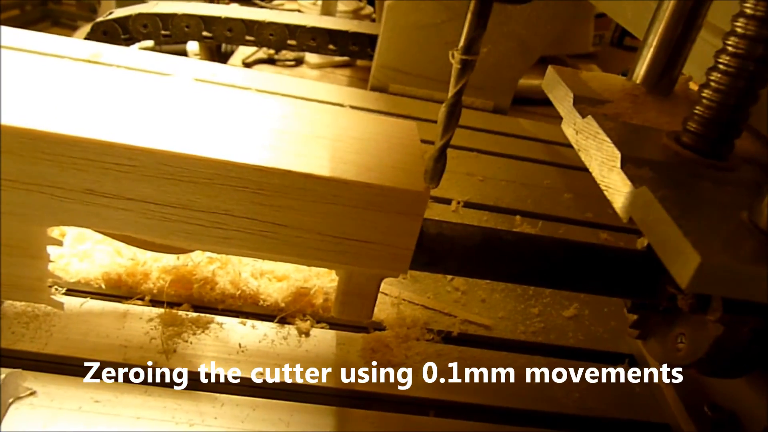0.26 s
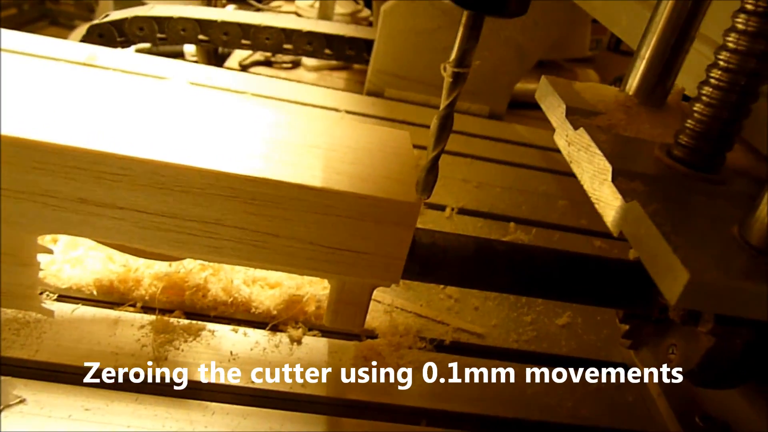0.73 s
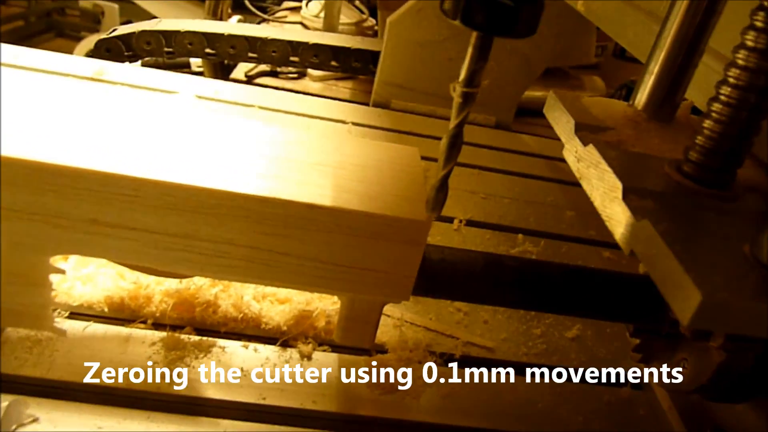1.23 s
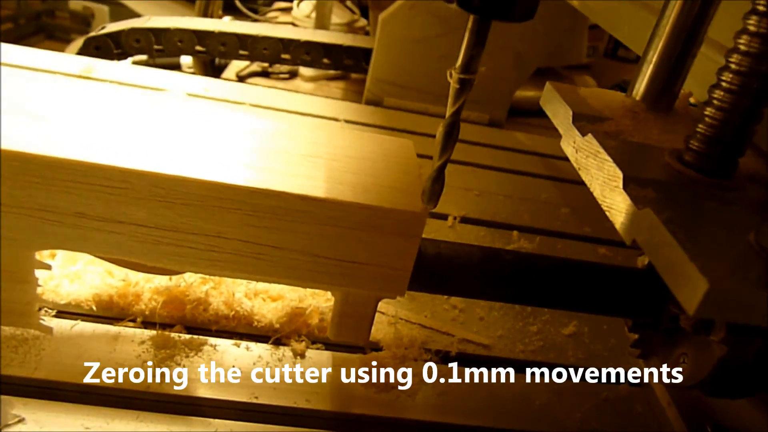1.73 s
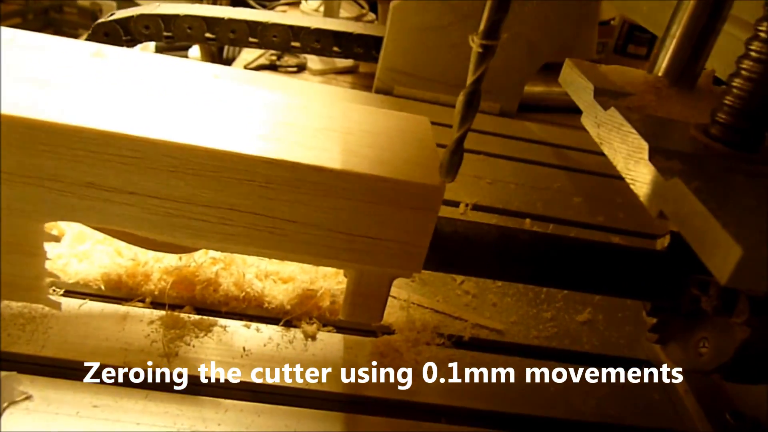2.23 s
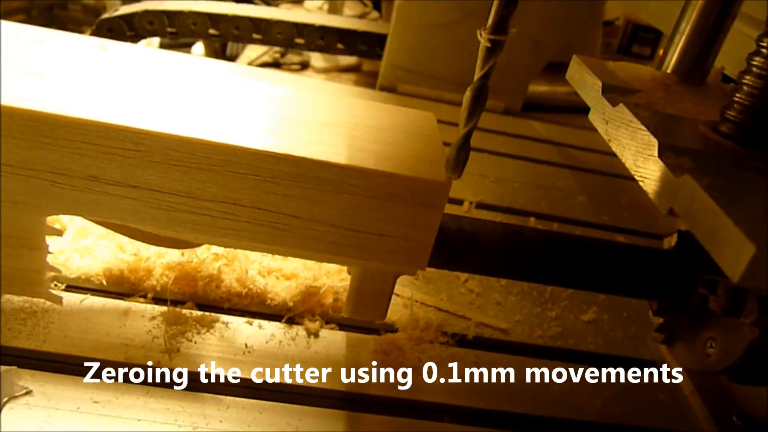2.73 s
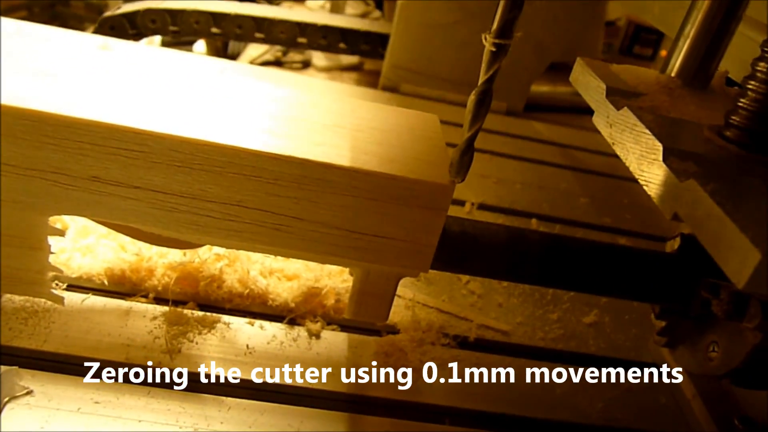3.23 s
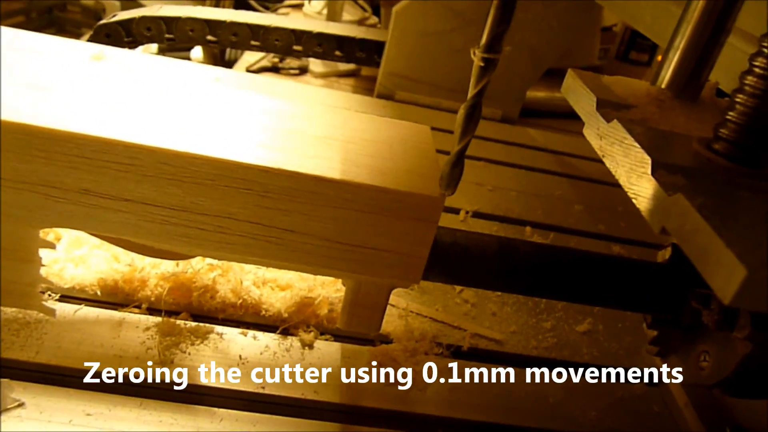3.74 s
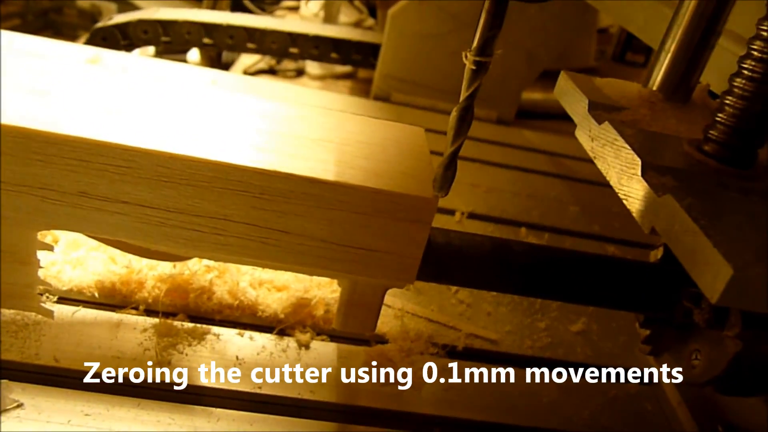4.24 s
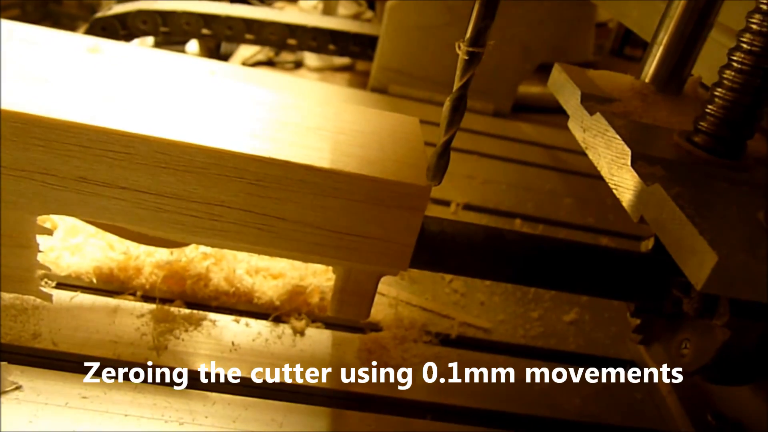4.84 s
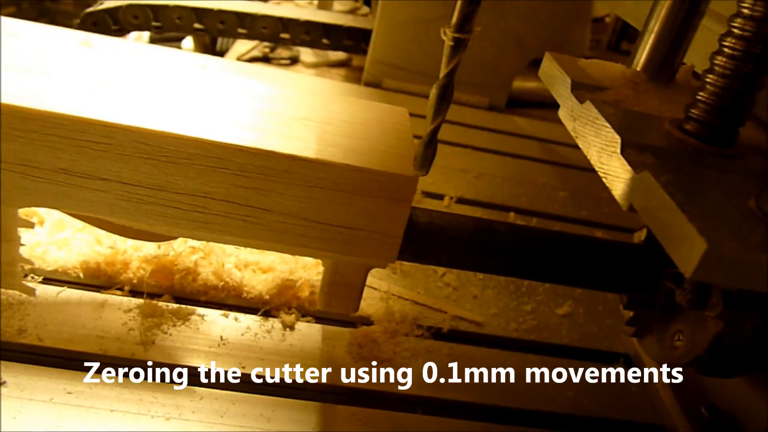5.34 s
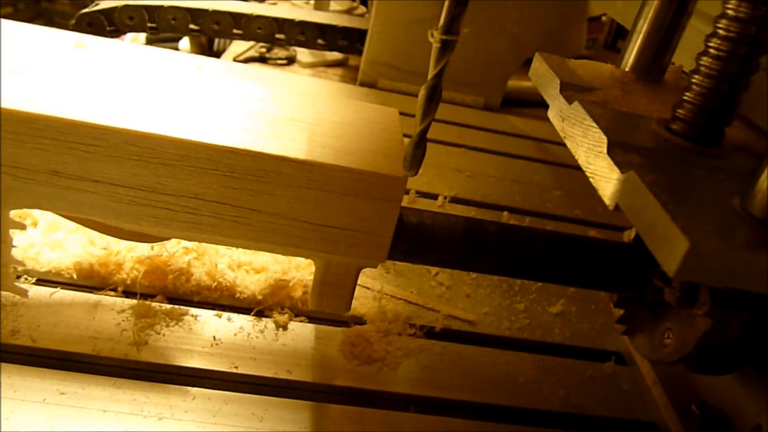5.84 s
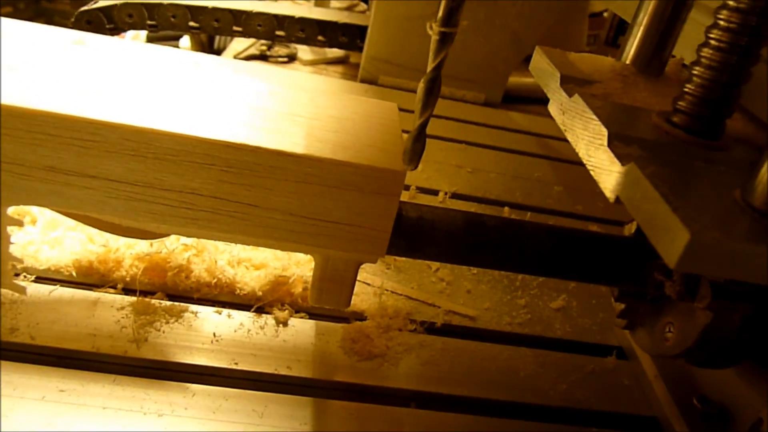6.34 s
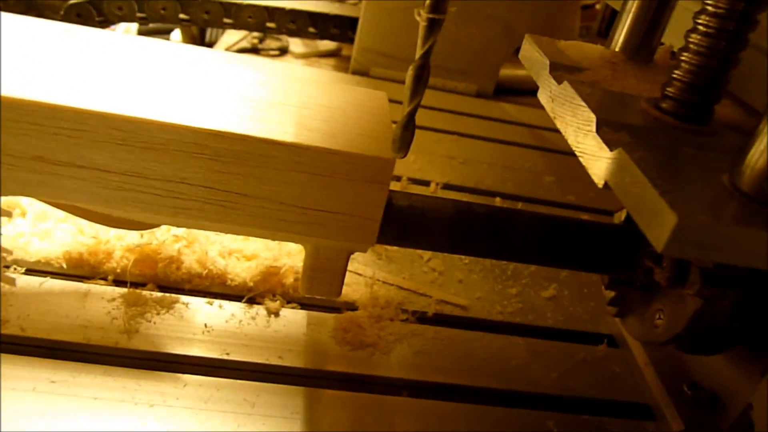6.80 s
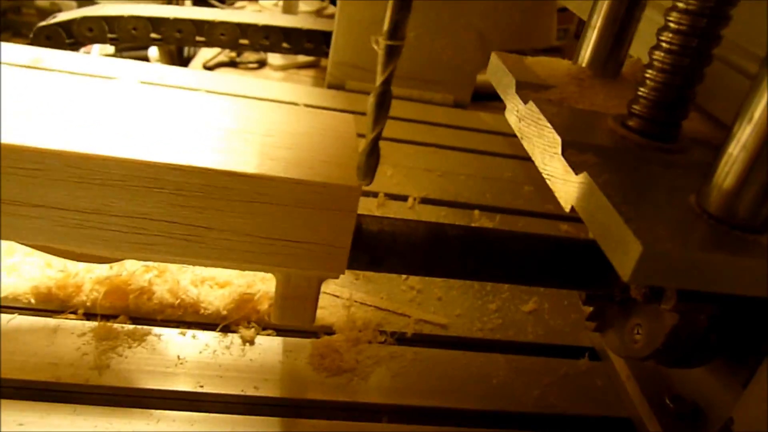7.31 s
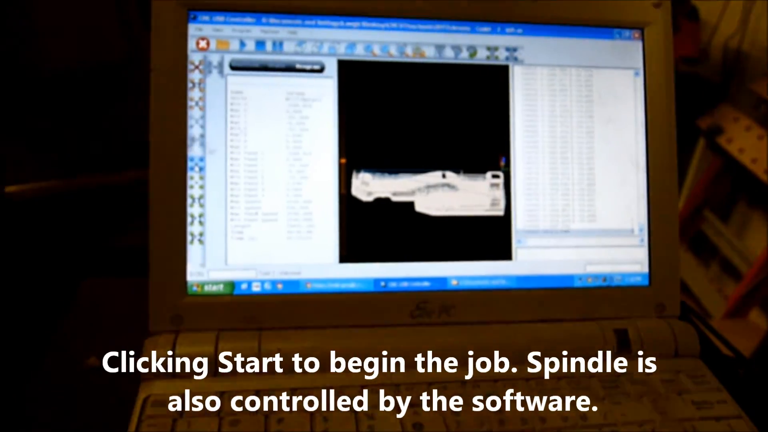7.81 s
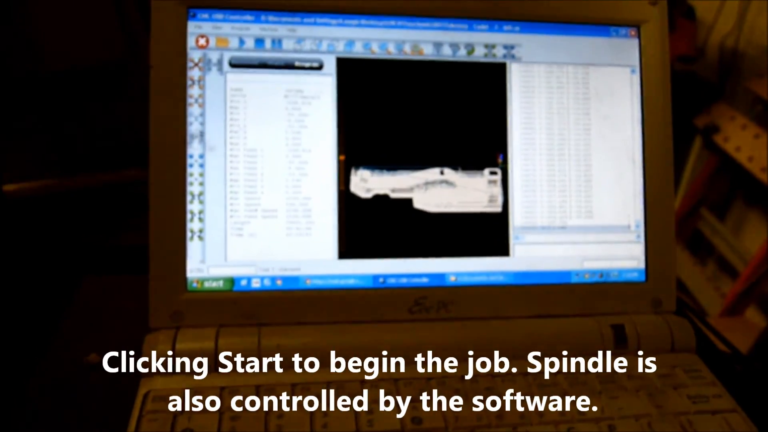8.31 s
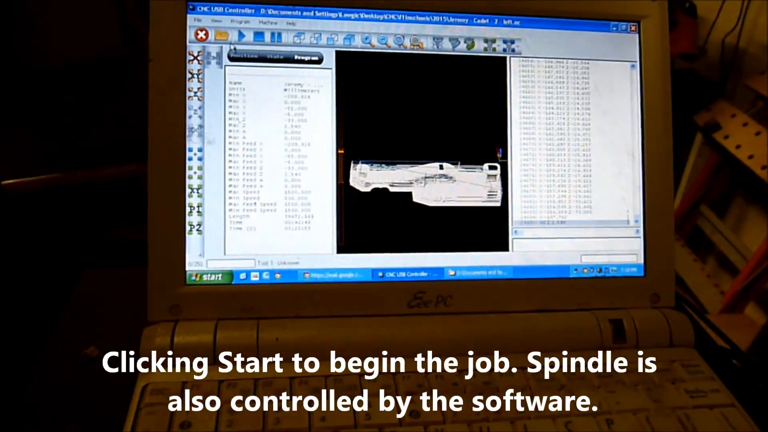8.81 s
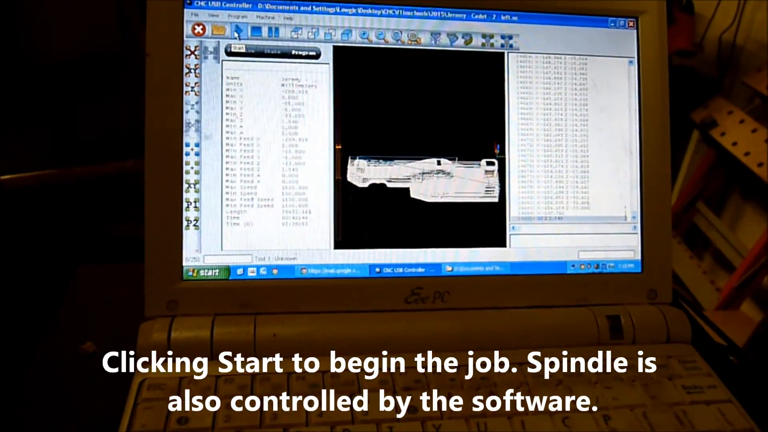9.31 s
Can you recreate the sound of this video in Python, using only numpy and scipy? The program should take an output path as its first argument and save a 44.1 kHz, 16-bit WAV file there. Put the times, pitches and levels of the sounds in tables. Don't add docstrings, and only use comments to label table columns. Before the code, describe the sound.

In a small workshop, a control box fan hums and rushes throughout, its tone wavering slightly. Two tiny knocks open, then after a pause come four firm machine jogs with faint key ticks, a quick run of ten knocks, and seven heavier thumping ones. A fingertip taps the hand-held camera; the sound cuts abruptly to a more tonal fan hum at a desk, with faint hiss and dull highs.

```python
import sys
import numpy as np
from scipy import signal
from scipy.fft import rfft, irfft, next_fast_len
from scipy.io import wavfile
from scipy.ndimage import uniform_filter1d

SR = 44100
rng = np.random.default_rng(int(sys.argv[2]) if len(sys.argv) > 2 else 0)


def ratio(d):
    e = np.asarray(d, float) / 20
    return 10 ** e


def unload_wav(signal):
    wavfile.write(
        sys.argv[1],
        SR,
        np.round(np.clip(np.atleast_2d(signal).T, -1, 1) * 32767).astype(np.int16),
    )


N = 421596
FIRST_SHOT_END_S, SECOND_SHOT_START_S = 7.66115, 7.67435


def walk(rate):
    hold = int(SR / rate)
    steps = np.repeat(rng.standard_normal(N // hold + 1), hold)
    return 1.3 * uniform_filter1d(uniform_filter1d(steps, hold), hold)[:N]


def noise(gain):
    size = next_fast_len(N)
    hz = np.arange(size // 2 + 1) * SR / size + 1
    x = irfft(rfft(rng.standard_normal(size)) * gain(hz), size)[:N]
    return x / x.std()


def colour(points):
    hz, db = np.transpose(points)
    return lambda f: ratio(np.interp(np.log(f), np.log(hz), db))


def add(out, first, sound):
    out[first:first + len(sound)] += sound


# time in seconds, turn from about -1 (front) to 1 (side).
HAND_TURN = [(0, 0.56), (.7, 0.9), (1.26, 0.84), (1.6, -0.67), (1.95, -1.4), (2.65, -.9), (2.9, .9),
             (3.4, .3), (3.9, 0.18), (4.9, -0.27), (5.6, 0.64), (5.8, -.6), (6.5, -.9), (7.05, 0.79),
             (7.6, -0.071), (7.87, -1.2), (8.2, -0.37), (9.4, 0.23)]


def drifts(desk):
    t = np.arange(N) / SR
    turn = np.interp(t, *np.transpose(HAND_TURN))
    full_turn_db = (0, 6.5, -0.5, -0.5)
    tremor_db = (.3, 1.2, 1.2, 1.5)
    dbs = [gain * turn + tremor * walk(4.5) for gain, tremor in zip(full_turn_db, tremor_db)]
    creep_start_s, creep_db_per_s = 4.1, 2
    dbs[-1] = dbs[-1] + creep_db_per_s * np.clip(t - creep_start_s, 0, None) * ~desk
    return [db - np.where(desk, db[desk].mean(), db[~desk].mean()) for db in dbs]


# multiple of the shaft rate, level at the table in dB, level at the desk in dB.
FAN_TONES = [(4, -47.5, -48), (7, -54.5, -36), (8, -61, -57), (14, -68.5, -50), (19, -71.5, -71),
             (20, -78.5, -63.5), (21, -59.5, -60), (24, -77, -77.5), (27, -77, -79), (28, -69, -58.5),
             (32, -73, -64.5), (35, -81.5, -76.5), (36, -77, -72.5), (40, -83.5, -90.5), (44, -89.5, -76),
             (48, -91.5, -85)]
# frequency in Hz, level in dB per Hz.
RUSH_TABLE = [(15, -65), (25, -24), (133, -14), (185, -20.5), (205, -6.5), (232, -8), (246, -0.5),
              (262, -9), (295, -12.5), (325, -10), (360, -15.5), (395, -12), (580, -15), (616, -21.5),
              (650, -14.5), (712, -15.5), (774, -18), (932, -12.5), (1100, -27.5), (1320, -28), (3500, -48),
              (4550, -79), (7700, -120)]
# frequency in Hz, level in dB per Hz.
RUSH_DESK = [(15, -75.5), (25, -29), (133, -21), (238, -5.5), (360, -16.5), (425, -11.5), (461, -16),
             (567, -20), (698, -24), (790, -28.5), (840, -15.5), (913, -27.5), (1700, -38), (3500, -53.5),
             (4550, -86), (7700, -120)]
# frequency in Hz, width in Hz, level at the table in dB, level at the desk in dB.
CAVITY = [(253, 110, -51, -48.5), (433.7, 32, -52, -61.5), (715, 70, -53.5, -48), (833, 44, -55.5, -56.5),
          (922, 26, -50.5, -57), (1005, 47, -58, -60), (1584, 120, -72.5, -65.5), (1793, 270, -66, -61.5),
          (2050, 340, -71, -67)]


def fan(desk):
    def place(pair):
        return np.where(desk, pair[1], pair[0])

    shaft_hz = place((61.5, 61.43)) * (1 + 0.000509 * walk(2.04))
    turn = 2 * np.pi * np.cumsum(shaft_hz) / SR
    tones = np.zeros(N)
    for multiple, *dbs in FAN_TONES:
        level = np.sqrt(2) * ratio(place(dbs) + 0.99 * walk(8.7))
        tones += level * np.sin(multiple * turn + rng.uniform(0, 2 * np.pi))
    hand_db = drifts(desk)
    rush = np.where(desk, noise(colour(RUSH_DESK)), noise(colour(RUSH_TABLE)))
    rush = rush * ratio(place((-42, -37.5)) + hand_db[0])
    for hz, width, *dbs in CAVITY:
        layer = np.searchsorted((620, 790, 1300), hz)
        drift = hand_db[layer] + .8 * walk(12)
        resonance = noise(lambda f: 1 / (1 + (2 * (f - hz) / width) ** 2))
        rush += resonance * ratio(place(dbs) + drift)
    return tones + rush


def strike(out, s, modes, lags, gain, detune):
    hz, t60, *swings = np.transpose(modes)
    for lag, swing in zip((0, *lags), swings):
        first = int(np.ceil((s + lag) * SR))
        t = (first + np.arange(SR // 2)) / SR - s - lag
        decay = np.exp(-np.log(1000) * np.outer(1 / t60, t))
        rings = np.sin(2 * np.pi * np.outer(hz * detune, t)) * decay
        add(out, first, swing * gain / 1000 @ rings)


# frequency in Hz, level in dB, time to fall 60 dB in seconds.
NUT = [(1226, -3, .08), (1445, -4, 0.072), (1650, -6.5, .09), (1900, -5.5, 0.074), (2126, -6, 0.089),
       (2560, -15, 0.065), (3000, -15, .09)]


def nut_ring(level_db):
    hz, ring_db, t60 = np.transpose(NUT)
    t = np.arange(SR // 10) / SR
    rings = np.sin(2 * np.pi * np.outer(hz, t)) * ratio(-60 * np.outer(1 / t60, t))
    levels = ratio(level_db + ring_db + 2.5 * rng.standard_normal(len(hz)))
    return levels @ rings * (1 - np.exp(-t / .002))


# frequency in Hz, level in dB.
RATTLE = [(700, -14.5), (1100, -3.5), (1500, -12), (2200, -20), (2600, -23.5), (3200, -30), (4000, -41),
          (6000, -65.5)]
# frequency in Hz, level in dB.
PANELS = [(40, -46), (90, -21), (140, -12), (250, -8), (600, -14), (900, -12), (1150, -29.5), (2000, -53.5),
          (4000, -82.5)]


def axis(jogs, modes, lags, rattle_db, loose_db, bench_db, bench_ms, nut_db, door_db):
    out, turning, loose, door = np.zeros((4, N + 2 * SR))
    since = np.arange(2 * SR) / SR
    screw = np.exp(-np.clip(since - .022, 0, None) / .02)
    slack = ratio(-8) * np.exp(-since / 0.0033)
    panels = (1 - np.exp(-since / 0.0037)) * np.exp(-since / 0.11)
    thump = since / 0.0074 * np.exp(-since / 0.012) * np.sin(2 * np.pi * 48 * since)
    door_swell = (1 - np.exp(-since / .08)) * ratio(-120 * since / 2.6)
    for s, db in jogs:
        first = round(s * SR)
        pitch_luck, level_luck = rng.standard_normal((2, len(modes)))
        strike(out, s, modes, lags, ratio(db + .5 * level_luck), 1 + .0015 * pitch_luck)
        add(turning, first, ratio(db) * (screw + slack))
        add(loose, first, ratio(db) * panels)
        add(out, first + bench_ms * SR // 1000, ratio(db + bench_db) * thump)
        add(out, first, nut_ring(db + nut_db))
        add(door, first, door_swell)
    door_tone = np.sqrt(2 * door[:N]) * np.sin(2 * np.pi * 149.5 * np.arange(N) / SR)
    rattle = ratio(rattle_db) * turning[:N] * noise(colour(RATTLE))
    buzz = ratio(loose_db) * loose[:N] * noise(colour(PANELS))
    return out[:N] + ratio(door_db) * door_tone + rattle + buzz


# frequency in Hz, time to fall 60 dB in seconds,
# then signed swing in thousandths at the first, second and third jolt.
FIRST_MODES = [(94.0, 0.25, -4.0, -16.0, 3.0), (128.4, 0.25, 45.0, -21.0, 21.0),
               (156.5, 0.25, -0.0, 44.0, -14.0), (189.1, 0.25, -55.0, 3.0, -0.0),
               (209.7, 0.156, 18.0, 20.0, 8.0), (257.7, 0.35, 4.0, 26.0, 7.0),
               (272.3, 0.208, 0.0, 6.0, -56.0), (338.9, 0.25, -9.0, -9.0, 1.0),
               (373.7, 0.056, -4.0, -32.0, -9.0), (429.4, 0.21, -7.0, -5.0, -14.0),
               (529.4, 0.35, -11.0, -11.0, -9.0), (637.2, 0.236, 3.0, -13.0, -7.0),
               (699.3, 0.141, -9.0, 8.0, 5.0), (734.7, 0.25, -13.0, 7.0, 1.0),
               (810.1, 0.223, -4.0, 7.0, -1.0), (856.5, 0.25, 6.0, 2.0, -6.0),
               (919.8, 0.25, 31.0, 11.0, -2.0), (1010.8, 0.25, -9.0, -13.0, 7.0),
               (1067.4, 0.4, 8.0, 6.0, -8.0), (1464.4, 0.25, -2.0, -0.0, -0.0)]
# start in seconds, level in dB.
FIRST_JOG = [
    (.01884, 0.0053),
]
# frequency in Hz, time to fall 60 dB in seconds,
# then signed swing in thousandths at the first, second and third jolt.
BACK_MODES = [(125.8, 0.181, 13.0, 4.0, 16.0), (148.5, 0.2, -5.0, -7.0, -11.0),
              (203.5, 0.2, -11.0, 19.0, -2.0), (257.9, 0.2, 1.0, 58.0, -15.0),
              (262.9, 0.2, 20.0, 27.0, -28.0), (274.5, 0.2, -29.0, 1.0, 25.0),
              (340.2, 0.101, -8.0, -38.0, 12.0), (378.0, 0.147, 15.0, 0.0, -7.0),
              (691.1, 0.03, -14.0, 4.0, -13.0), (925.3, 0.2, 25.0, -3.0, 10.0),
              (981.5, 0.2, 28.0, -14.0, 4.0), (992.1, 0.03, -28.0, -5.0, 5.0)]
# start in seconds, level in dB.
BACK_JOG = [
    (.1125, 0.024),
]


def opening_jogs():
    move = dict(rattle_db=-50, loose_db=-42, bench_db=-41, bench_ms=0, nut_db=-50, door_db=-55)
    first = axis(FIRST_JOG, FIRST_MODES, (.01504, .03988), **move)
    return first + axis(BACK_JOG, BACK_MODES, (.00609, .02906), **move)


# start in seconds, level in dB.
KEY_TICKS = [
    (2.3465, -52),
    (3.006, -50),
]


def keys():
    out, t = np.zeros(N), np.arange(SR // 20) / SR
    start_hz, rise_hz_per_s = 2480, 25000
    shape = np.sqrt(2) * (1 - np.exp(-t / .001)) * np.exp(-t / .005)
    ring = shape * np.sin(2 * np.pi * (start_hz + rise_hz_per_s * t) * t)
    for s, db in KEY_TICKS:
        add(out, int(s * SR), ratio(db) * ring)
    return out


# frequency in Hz, time to fall 60 dB in seconds,
# then signed swing in thousandths at the first, second and third jolt.
HEAD_MODES = [(102.6, 0.22, -6.0, 6.0, 4.0), (127.7, 0.7, 42.0, 22.0, -11.0),
              (151.4, 0.28, 8.0, -32.0, -1.0), (178.2, 0.194, -25.0, 39.0, -3.0),
              (208.0, 0.103, -22.0, -46.0, -7.0), (243.9, 0.22, 16.0, -6.0, 5.0),
              (276.3, 0.22, -14.0, 12.0, 17.0), (288.5, 0.22, 25.0, 10.0, 1.0),
              (343.3, 0.084, 2.0, -57.0, 1.0), (393.0, 0.045, -12.0, 33.0, 3.0),
              (427.7, 0.22, -2.0, -4.0, 5.0), (525.6, 0.206, -6.0, -5.0, 6.0),
              (640.4, 0.22, 4.0, 13.0, -2.0), (683.7, 0.058, -13.0, -10.0, 3.0),
              (743.1, 0.124, -8.0, 2.0, 1.0), (824.1, 0.22, -7.0, -1.0, -2.0),
              (865.4, 0.3, 9.0, -4.0, -6.0), (921.8, 0.3, 19.0, -8.0, 3.0),
              (1008.5, 0.182, -6.0, 15.0, 5.0), (1070.0, 0.191, 7.0, 0.0, 2.0)]
# start in seconds, level in dB.
HEAD_JOGS = [
    (2.3765, 1.2),
    (2.7827, 1.2),
    (3.0169, 0.21),
    (3.1262, 0.28),
]


def head_jogs():
    return axis(HEAD_JOGS, HEAD_MODES, (.01133, .04972), rattle_db=-53, loose_db=-44,
                bench_db=-35, bench_ms=0, nut_db=-52, door_db=-51)


# frequency in Hz, time to fall 60 dB in seconds, then signed swing
# in thousandths at the jolts 0, 21 and 11 ms after the start.
GANTRY_MODES = [(102.6, 0.102, -10.0, -15.0, -40.0), (129.8, 0.593, 33.0, -51.0, 55.0),
                (143.8, 0.45, -46.0, 10.0, -16.0), (180.8, 0.154, 6.0, 1.0, -33.0),
                (196.0, 0.1, 34.0, -5.0, -20.0), (281.8, 0.071, -15.0, 54.0, -9.0),
                (314.4, 0.147, 21.0, -43.0, 12.0), (374.4, 0.168, 4.0, 10.0, 18.0),
                (398.5, 0.096, 6.0, 17.0, 10.0), (432.1, 0.22, -26.0, 1.0, 3.0),
                (451.3, 0.189, 29.0, -9.0, -17.0), (576.4, 0.183, 4.0, 7.0, 7.0),
                (670.7, 0.138, -11.0, -2.0, -20.0), (690.3, 0.153, 5.0, 8.0, 23.0),
                (827.2, 0.22, 12.0, -27.0, 2.0), (855.9, 0.075, 42.0, 9.0, -62.0),
                (922.4, 0.24, -63.0, 22.0, 16.0), (1070.2, 0.115, -7.0, -2.0, 1.0),
                (1314.4, 0.05, 6.0, 1.0, 3.0)]
# start in seconds, level in dB.
GANTRY_JOGS = [(3.4221, -0.5), (3.6253, 1.5), (3.7971, 1), (3.9377, 1), (4.0938, 1), (4.2343, 1),
               (4.4061, 1), (4.5154, 0.8), (4.656, 1.5), (4.8121, 0.4)]


def gantry_jogs():
    return axis(GANTRY_JOGS, GANTRY_MODES, (.02067, .01118), rattle_db=-51, loose_db=-41,
                bench_db=-38, bench_ms=14, nut_db=-49, door_db=-41)


# frequency in Hz, time to fall 60 dB in seconds,
# then signed swing in thousandths at the first, second and third jolt.
BED_MODES = [(90.7, 0.22, 13.0, 13.0, -2.0), (101.2, 0.22, -4.0, -8.0, 21.0),
             (131.7, 0.7, -111.0, -28.0, -53.0), (163.0, 0.22, 39.0, -47.0, -33.0),
             (181.3, 0.111, 23.0, 46.0, 68.0), (236.0, 0.22, 58.0, -56.0, -62.0),
             (277.6, 0.22, -20.0, 31.0, -13.0), (307.7, 0.147, -53.0, 28.0, -20.0),
             (326.7, 0.21, 45.0, -2.0, 1.0), (401.6, 0.07, -8.0, 11.0, 24.0),
             (482.9, 0.208, -8.0, 4.0, -1.0), (527.0, 0.098, 3.0, -2.0, 10.0),
             (562.1, 0.183, 3.0, -14.0, 7.0), (628.2, 0.22, -7.0, -15.0, -3.0),
             (931.3, 0.083, -12.0, 7.0, -20.0), (942.0, 0.122, 35.0, 8.0, 18.0)]
# start in seconds, level in dB.
BED_JOGS = [(5.4056, 1.2), (5.6243, 1.5), (5.7648, 1.3), (5.9371, 1.4), (6.1395, 1.1), (6.2806, .7),
            (6.6705, 1.2)]


def bed_jogs():
    return axis(BED_JOGS, BED_MODES, (.01187, .02622), rattle_db=-48, loose_db=-39.5,
                bench_db=-28, bench_ms=0, nut_db=-43, door_db=-48)


# frequency in Hz, time to fall 60 dB in seconds,
# then signed swing in thousandths at tick, landing and settling.
TAP_MODES = [(84.8, 0.018, 3.3, 3.5, -7.3), (244.4, 0.045, 7.1, -45.4, -22.4),
             (431.9, 0.083, -24.0, -26.1, 6.9), (526.4, 0.018, 1.1, -1.6, -17.7),
             (644.2, 0.072, -19.2, -7.1, -9.0), (734.0, 0.09, 5.0, 19.4, 5.9),
             (853.5, 0.035, 19.4, 25.7, -30.3), (967.5, 0.09, 21.7, -20.7, 7.7),
             (1059.1, 0.09, -39.9, -5.5, 10.0), (1213.7, 0.072, 24.9, 4.3, 28.8),
             (1330.7, 0.08, 0.7, -1.7, -6.0), (1706.8, 0.065, 12.0, -3.1, 0.1),
             (1977.7, 0.04, 6.5, 2.7, 0.9), (2227.0, 0.018, 0.9, 8.7, 0.9), (2624.8, 0.09, -2.8, -4.2, 3.1),
             (3324.4, 0.055, -1.8, 0.9, 1.2), (3991.8, 0.03, -2.0, 3.5, -1.0)]


def tap():
    start_s = 7.4348
    out, since = np.zeros(N), np.arange(N) / SR - start_s
    strike(out, start_s, TAP_MODES, (.00294, .00601), 1, 1.0)
    scrape = (since > 0) * np.exp(-(since / .006) ** 4)
    return out + ratio(-53) * scrape * noise(lambda f: 1 / (1 + ((f - 3600) / 1300) ** 4))


def scene():
    desk = np.arange(N) / SR > FIRST_SHOT_END_S
    blows = opening_jogs() + head_jogs() + gantry_jogs() + bed_jogs() + tap()
    contact = np.hanning(9)
    blows = np.convolve(blows, contact / contact.sum(), "same")
    return (fan(desk) + blows + keys())[None]


# frequency in Hz, level in dB per Hz.
HISS = [(20, 15), (60, 6), (200, -4.5), (1500, -11.5), (3000, -2.5), (4500, -2.5), (6500, -3), (7500, -1.5)]


def camera_noise():
    whine = np.sqrt(2) * np.sin(2 * np.pi * 6650 * np.arange(N) / SR)
    return ratio(-59.5) * noise(colour(HISS)) + ratio(-83) * whine


def low_pass(x):
    return signal.sosfilt(signal.butter(12, 16000, fs=SR, output="sos"), x)


def record(dry):
    bottom_hz, top_hz, offset = 70, 8250, -.0018
    x = signal.lfilter(*signal.butter(2, bottom_hz, "high", fs=SR), dry) + camera_noise()
    x = signal.sosfilt(signal.cheby2(12, 45, top_hz, fs=SR, output="sos"), x) + offset
    last = int(FIRST_SHOT_END_S * SR)
    chop = last - 40 + np.argmin(np.abs(np.abs(x[0, last - 40:last]) - .011))
    ease_in = np.clip((np.arange(N) / SR - SECOND_SHOT_START_S) / .001, 0, 1)
    x = x * np.where(np.arange(N) <= chop, 1, ease_in)
    return low_pass(x)


dry = scene()
out = record(dry)
unload_wav(out)
```